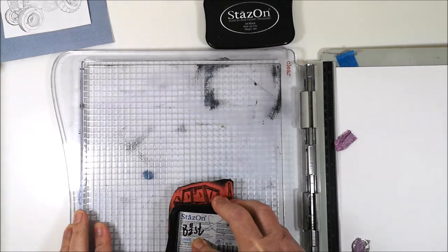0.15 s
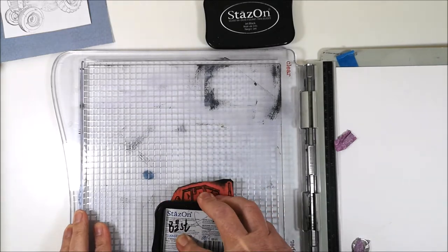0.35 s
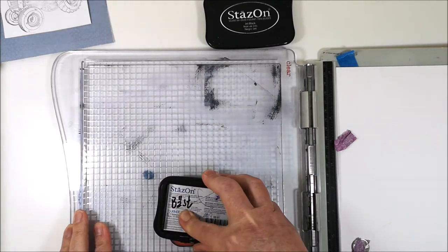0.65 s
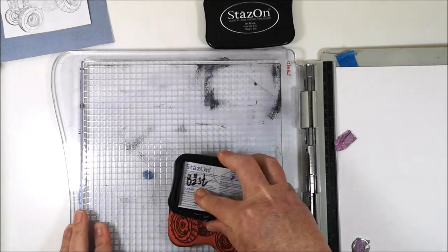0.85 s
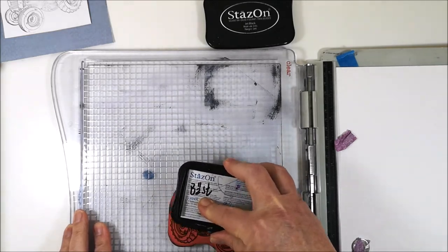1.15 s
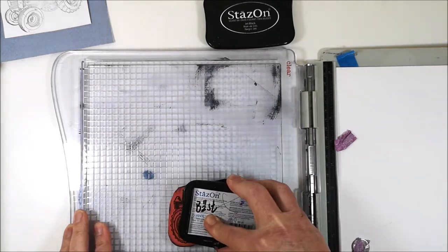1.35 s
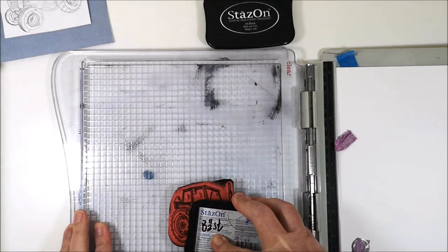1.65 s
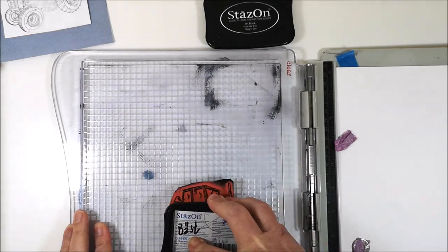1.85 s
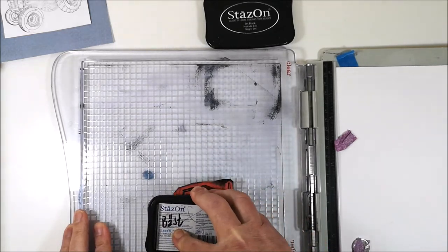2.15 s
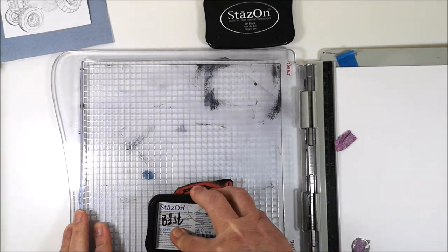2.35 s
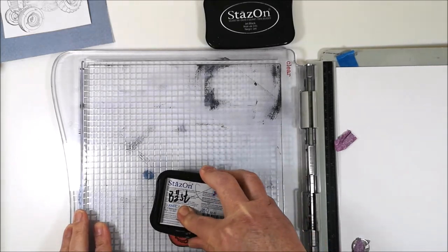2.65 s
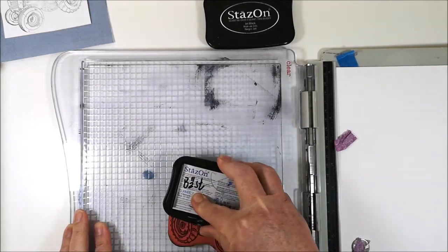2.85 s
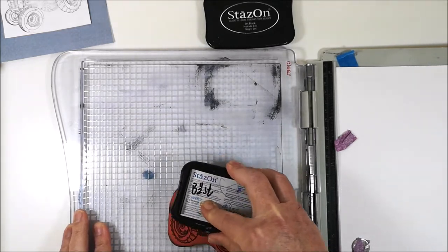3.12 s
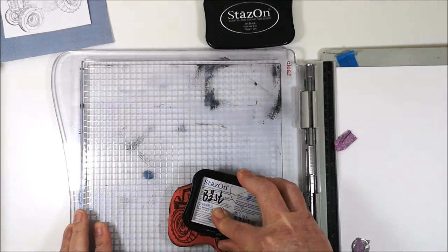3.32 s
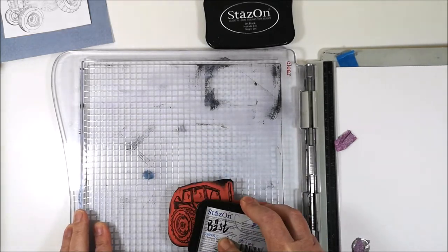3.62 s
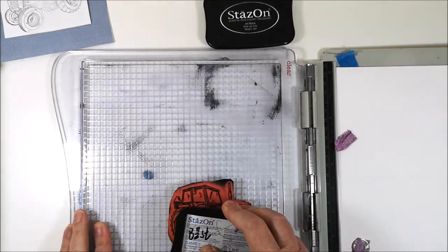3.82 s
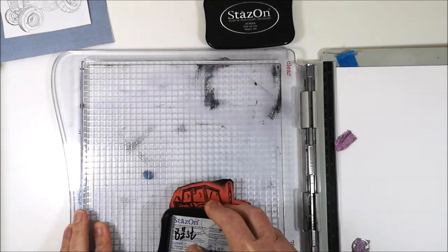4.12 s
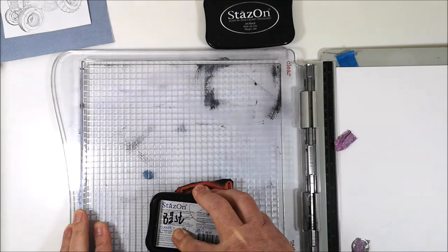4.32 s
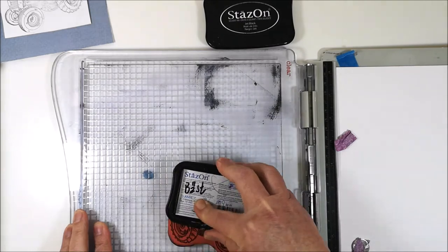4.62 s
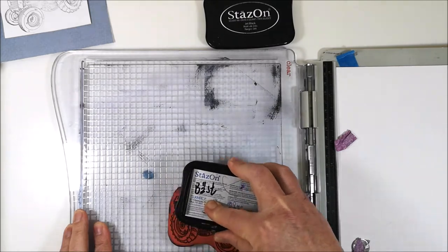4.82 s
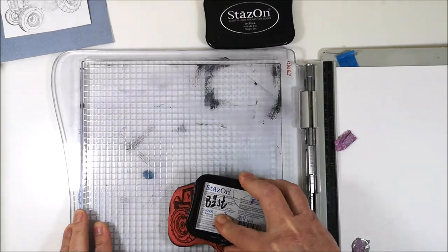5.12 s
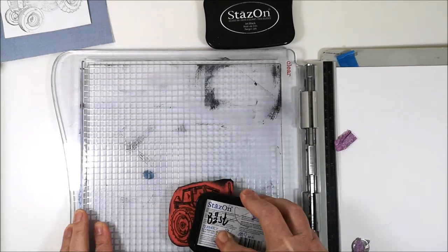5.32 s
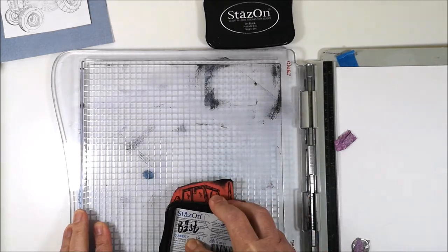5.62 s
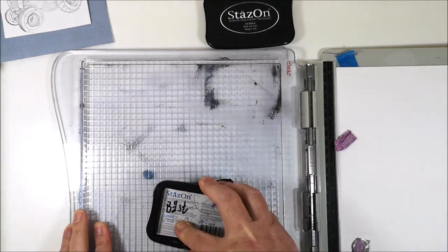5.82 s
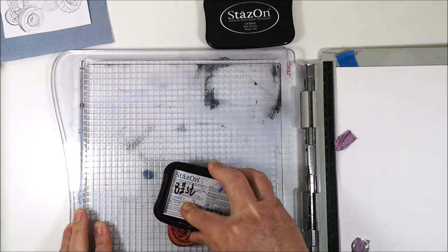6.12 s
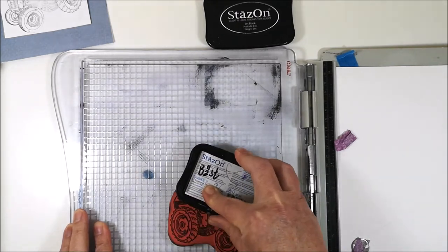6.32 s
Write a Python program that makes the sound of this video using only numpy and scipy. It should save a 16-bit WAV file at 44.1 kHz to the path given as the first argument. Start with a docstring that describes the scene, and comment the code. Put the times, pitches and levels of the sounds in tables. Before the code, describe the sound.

An ink pad in a plastic case dabs a stamp about three times a second, with soft hollow knocks and occasional sharper clacks.

```python
"""Dabbing an ink pad on a rubber stamp

An ink pad in a plastic case dabs, three times a second, a stamp on a plastic plate on a table.
Each dab rings damped modes of plate, case and table, then of the stand of the microphones.
Noise bursts give the rattle and slap of the case and the ticks of the tacky pad; a creak is one mode.
Decaying noise answers as a small room, over machine hum and hiss; a suppressor closes between dabs."""
import sys
import numpy as np
from scipy import signal
from scipy.fft import rfft, irfft, next_fast_len
from scipy.io import wavfile
from scipy.ndimage import uniform_filter1d, minimum_filter1d, map_coordinates

SR = 44100
rng = np.random.default_rng(int(sys.argv[2]) if len(sys.argv) > 2 else 0)


def voltage_ratio(level):
    """Linear amplitude factor for a level in decibels (scalar or array-like)."""
    return 10 ** (np.asarray(level, float) / 20)


def put_to_file(sound):
    """Save the sound as 16-bit audio at rate SR, in the file named by the first command-line argument."""
    columns = np.atleast_2d(sound).T  # one column per channel
    safe = np.clip(columns, -1, 1)
    whole_steps = np.round(safe * 32767)
    wavfile.write(sys.argv[1], SR, whole_steps.astype(np.int16))


N = 284886  # samples in the scene
T = np.arange(SR // 2) / SR  # time axis of one event, s

# machine hum lines: (f/Hz, mean level/dB rms)
HUM_LINES = [(48.4, -55), (96.9, -55.5), (118.4, -66.5)]
# hiss spectrum: (f/Hz, relative level/dB)
HISS_SPECTRUM = [(15, -34.5), (25, 0), (48, -24), (107, -11.5), (122, -15), (160, -32.5), (194, -27.5),
                 (423, -32), (584, -37.5), (807, -42.5), (1380, -38.5), (1960, -33), (4060, -42),
                 (7750, -50), (15600, -60.5)]
# left-right correlation of the hiss: (f/Hz, correlation)
HISS_CORRELATION = [(60, 0.98), (150, 0.92), (300, 0.51), (600, 0)]
# decay of the room: (f/Hz, t60/s)
ROOM_DECAY = [(100, 0.49), (500, 0.3), (1500, 0.38), (4000, 0.51), (10000, 0.4)]
# room over direct sound: (f/Hz, level/dB)
ROOM_LEVEL = [(60, -14), (200, -9.5), (420, -7), (800, -5), (2000, -4.5), (6000, -5.5)]
# the walls answer more from the right: (f/Hz, left over right level/dB)
ROOM_PAN = [(300, 0), (1500, -3), (6000, -2)]
# direct sound: (f/Hz, left over right level/dB)
DIRECT_PAN = [(300, 0), (700, 1), (2000, 1), (4000, 6), (9000, 5), (14000, -3.5)]
# the tacky pad lets go of the rubber: (t/s, level/dB before the tick's spectrum)
PAD_LIFTS = [(0.58, -57), (1.5508, -50.5), (2.2162, -45.5), (2.5185, -49.5), (3.1874, -43), (4.351, -49),
             (4.564, -47.5), (5.5882, -46), (5.882, -45.5)]
# a finger shifts on the case: (t/s, level/dB, f/Hz)
CASE_CREAKS = [(0.6858, -41, 2630), (2.3577, -34.5, 2200)]
# the case slaps down: (t/s, level/dB before the slap's spectrum)
CASE_SLAPS = [(0.0899, -20), (0.395, -41), (0.6855, -55), (1.0006, -44.5), (1.3524, -24), (1.6796, -43),
              (2.0174, -21), (2.3311, -35.5), (2.6424, -53.5), (2.964, -49), (3.325, -30), (3.683, -26.5),
              (4.0444, -22.5), (4.3919, -49), (4.7077, -32), (5.0398, -25.5), (5.3574, -46),
              (5.7039, -35.5), (6.0501, -40.5), (6.3854, -34.5)]
# spectrum of a slap: (f/Hz, relative level/dB)
SLAP_SPECTRUM = [(150, -45), (600, -20), (1500, -3), (3000, 0), (4200, -6), (5200, -3), (8300, -4),
                 (9500, -14), (10300, -22), (11000, -38), (15500, -48)]
# dabs and rebounds: (t/s, plate ring level/dB, knock level/dB, table thud level/dB, squeeze of the pad/ms)
DAB_BLOWS = [(.091, -14.5, -17.5, -20.5, 4.94), (.104, -21.5, -20.5, -27, 4.6),
             (0.389, -35.5, -37, -26, 4.8), (.688, -25, -45, -31, 4.8), (1.0016, -21, -32, -25.5, 2.9),
             (1.352, -17, -29.5, -22, 4.4), (1.675, -21.5, -26, -21.5, 5.46), (1.686, -34, -33.5, -33.5, 4),
             (2.018, -11.5, -19.5, -20.5, 3.82), (2.324, -33, -35, -25.5, 7.6),
             (2.642, -25.5, -43, -29, 3.34), (2.966, -19.5, -37.5, -27.5, 3.47),
             (3.321, -18.5, -30, -25, 5), (3.68, -19, -29, -22, 3.97), (3.696, -22, -27.5, -25, 5.3),
             (4.043, -20.5, -20.5, -22.5, 5.52), (4.056, -32, -30, -33.5, 4.5),
             (4.387, -29.5, -31.5, -21, 4.15), (4.706, -22.5, -26, -21.5, 5.34),
             (5.036, -17, -35, -25, 3.3), (5.355, -31, -40, -26.5, 4.7), (5.704, -20.5, -28.5, -23, 4.92),
             (6.043, -30.5, -34, -25.5, 7.4), (6.384, -26.5, -31.5, -23.5, 3.7)]
# lower and upper main plate modes: (f/Hz, t60/s)
PLATE_MODES = [(384, 0.081), (462, 0.07)]
# case and plate modes in the knock, before random spread: (f/Hz, relative level/dB, t60/s)
CASE_MODES = [(671.5, -3, 0.064), (788.4, 1, 0.068), (832, 2, 0.061), (941.3, 1, 0.057),
              (1022, -3.5, 0.071), (1155, -3, 0.075), (1221.5, -15.5, 0.085), (1340, -9, 0.033),
              (1512, -22.5, 0.026), (1751, -3.5, 0.038), (1961, 6, 0.032), (2056, -8, 0.037),
              (2453, -14.5, .03)]
# loose noise of the case: (f/Hz, relative level/dB)
RATTLE_SPECTRUM = [(50, -2), (150, 8.5), (300, 7), (620, 17.5), (800, 20), (1500, 19), (2500, 11),
                   (4000, -0.5), (8000, -27.5)]
# table modes: (f/Hz, relative level/dB, t60/s, sign of the first swing)
TABLE_MODES = [(21.3, -16, .5, 1), (48.4, -10, .5, -1), (60.4, -4, .19, -1), (100, -8.6, .29, -1),
               (133.4, -11.3, .32, 1)]
# microphone stand modes: (f/Hz, relative level/dB, t60/s, sign of the first swing)
STAND_MODES = [(44.8, -9.7, .33, 1), (71.7, -17.5, .34, 1), (83.5, -11.6, .245, -1), (125, -12.4, .135, -1)]
# upper modes of the table top, before random spread: (f/Hz, relative level/dB, t60/s)
BOARD_MODES = [(150.5, -14.5, 0.3), (168.5, -13, 0.3), (206, -17, 0.22), (234.1, -9.5, 0.19),
               (275.5, -18.5, 0.24), (320, -14, 0.21)]
# noise suppressor bands: (from f/Hz, to f/Hz, fully open from level/dB, attenuation when shut/dB)
GATE_BANDS = [(162, 520, -64, 11), (700, 4400, -54, 5), (2600, 20500, -55, 4)]

RIGHT_DELAY_S = 0.00017  # the left microphone is nearer
SQUEEZE_S = 0.004  # the soft pad touches this long before the blow is heard in full
KNOCK_LAG_S = 0.0015  # the case takes the blow after the pad has given
# upper plate mode over the lower: level at a 5 ms squeeze, change per ms, highest
UPPER_DB, UPPER_DB_PER_MS, UPPER_TOP_DB = 0, 6, 5
# start of the table thud relative to the blow time: offset in s, plus this many squeeze times
THUD_OFFSET_S, THUD_OFFSET_PER_SQUEEZE = -0.006, 0.37


def along(points, hz):
    """Interpolation of (f/Hz, value) points on a logarithmic frequency axis."""
    f, value = np.transpose(points)
    return np.interp(np.log(hz + 1), np.log(f + 1), value)


def filtered(x, response):
    """Linear filtering: the spectrum is multiplied by a function of frequency."""
    size = next_fast_len(x.shape[-1] + 8192)
    spectrum = rfft(x, size) * response(np.fft.rfftfreq(size, 1 / SR))
    return irfft(spectrum, size)[..., :x.shape[-1]]


def add(track, s, sound):
    """Superposition of one event on a stereo track at s seconds."""
    track[:, max(round(s * SR), 0):][:, :len(T)] += sound


def ring(hz, t60, rise_s, late_s=0, phase=0):
    """Damped resonance: a mode builds over the contact time, then decays exponentially."""
    t = np.maximum(T - late_s, 0)
    build_up = (1 - np.exp(-t / rise_s)) ** 2
    return np.sin(2 * np.pi * hz * t + phase) * voltage_ratio(-60 * t / t60) * build_up


def burst(rise_s, t60):
    """Decaying noise, uncorrelated between the two microphones."""
    build_up = (1 - np.exp(-T / rise_s)) ** 2
    return rng.standard_normal((2, len(T))) * build_up * voltage_ratio(-60 * T / t60)


def wobble(rate):
    """Slow random modulation: a smooth curve through rate random knots a second."""
    knots = rng.standard_normal(int(N * rate / SR) + 4)
    return map_coordinates(knots, [np.arange(N) * rate / SR])


def machine_hum():
    """Line spectrum: steady frequencies whose level and phase wander slowly."""
    t = np.arange(N) / SR
    hum = np.zeros(N)
    for hz, db in HUM_LINES:
        level_db = db + 1.5 * wobble(3)
        phase = 0.5 * wobble(2)  # rad
        hum += np.sqrt(2) * voltage_ratio(level_db) * np.sin(2 * np.pi * hz * t + phase)
    return hum


def hiss():
    """Partial coherence: mid and side noise shares make the bass nearly alike at both microphones."""
    def shares(hz):
        angle = np.arccos(np.clip(along(HISS_CORRELATION, hz), -1, 1)) / 2
        return voltage_ratio(along(HISS_SPECTRUM, hz)) * [np.cos(angle), np.sin(angle)]

    mid, side = filtered(rng.standard_normal((2, N)), shares)
    drift_db = 0.8 * wobble(3)
    return voltage_ratio(-20.5 + drift_db) * np.array([mid + side, mid - side])


def room(x):
    """Reverberation: convolution with noise that decays at a rate set by frequency."""
    out = np.zeros((2, N + SR))
    step = SR // 3  # each third of a second of sound meets a fresh tail
    for start in range(0, N, step):
        hz, t, z = signal.stft(rng.standard_normal((2, SR // 2)), SR, nperseg=256)
        decay = voltage_ratio(-60 * t / along(ROOM_DECAY, hz)[:, None])
        tail = signal.istft(z * decay, SR, nperseg=256)[1]
        tail = tail / np.linalg.norm(tail[0])
        wet = signal.fftconvolve(x[:, start:start + step], tail, axes=1)
        out[:, start + 300:][:, :wet.shape[1]] += wet  # delayed by 300 samples
    return out[:, :N]


def small_sounds():
    """Release of adhesion gives a noise tick; a shifting finger excites one short mode of the case."""
    track = np.zeros((2, N + SR))
    tick_spectrum = [(700, -19), (1800, 7), (4500, -6), (7500, 1.5), (11000, -16.5)]  # (f/Hz, level/dB)
    for s, db in PAD_LIFTS:
        tick = filtered(burst(0.00038, 0.013), lambda hz: voltage_ratio(along(tick_spectrum, hz)))
        add(track, s, voltage_ratio(db) * tick)
    for s, db, hz in CASE_CREAKS:
        add(track, s, voltage_ratio(db) * ring(hz, 0.031, 0.0002) * np.ones((2, 1)))
    return track[:, :N]


def slaps():
    """Impact of hard bodies: the brief contact of case and plate gives a bright, short crack."""
    track = np.zeros((2, N + SR))
    for s, db in CASE_SLAPS:
        add(track, s, voltage_ratio(db) * burst(0.00025, 0.036))
    return filtered(track[:, :N], lambda hz: voltage_ratio(along(SLAP_SPECTRUM, hz)))


def table_thud():
    """Structure-borne sound: the table modes swing first, the stand modes 36 ms later."""
    thud = np.zeros(len(T))
    for hz, db, t60, sign in TABLE_MODES:
        thud += sign * voltage_ratio(db) * ring(hz, t60, 0.0073)
    for hz, db, t60, sign in STAND_MODES:
        thud += sign * voltage_ratio(db) * ring(hz, t60, 0.0028, late_s=0.0359)
    board = np.zeros(len(T))
    for hz, db, t60 in BOARD_MODES:
        # where the blow lands sets the level and phase of each upper mode
        level_chance, phase_chance = rng.standard_normal(2)
        board += voltage_ratio(db + 2.6 * level_chance) * ring(hz, t60, 0.017, phase=3 * phase_chance)
    return thud * voltage_ratio([[0], [-0.4]]) + board


def case_knock(rise_s, late):
    """Modal radiation: each mode of the case reaches each microphone differently, with loose rattle."""
    knock = np.zeros((2, len(T)))
    for hz, db, t60 in CASE_MODES:
        level_chance, pitch_chance, phase_chance = rng.standard_normal((3, 2, 1))
        mode_hz = hz * (1 + 0.022 * pitch_chance[0])  # the same at both microphones
        mode = ring(mode_hz, t60, 1.07 * rise_s, late, 3 * phase_chance)
        knock += voltage_ratio(db + 3.1 * level_chance) * mode
    rattle = filtered(burst(0.88 * rise_s, 0.053), lambda hz: voltage_ratio(along(RATTLE_SPECTRUM, hz)))
    return knock + rattle


def plate_ring(low_db, squeeze_ms, rise_s, late):
    """Modal superposition: the upper plate mode is louder with a longer squeeze, up to a limit."""
    high_db = low_db + min(UPPER_DB + UPPER_DB_PER_MS * (squeeze_ms - 5), UPPER_TOP_DB)
    plate = np.zeros((2, len(T)))
    for db, (hz, t60) in zip((low_db, high_db), PLATE_MODES):
        plate -= voltage_ratio(db) * ring(hz, t60, 0.76 * rise_s, late)
    return plate


def dabs():
    """Two transmission paths: plate ring and case knock through air, thud through the solid."""
    air, solid = np.zeros((2, 2, N + SR))
    late = np.array([[0], [RIGHT_DELAY_S]])
    for s, low_db, knock_db, thud_db, squeeze_ms in DAB_BLOWS:
        rise_s = max(squeeze_ms, 1) / 1000
        touch_s = s - SQUEEZE_S
        add(air, touch_s, plate_ring(low_db, squeeze_ms, rise_s, late))
        add(air, touch_s + KNOCK_LAG_S, voltage_ratio(knock_db) * case_knock(rise_s, late))
        # a longer squeeze reaches the table later
        thud_s = s + THUD_OFFSET_S + THUD_OFFSET_PER_SQUEEZE * rise_s
        add(solid, thud_s, voltage_ratio(thud_db) * table_thud())
    return air[:, :N], solid[:, :N]


def scene():
    """Superposition of direct sound, room, structure-borne thud and background."""
    background = machine_hum() + hiss()
    small = small_sounds()
    air, solid = dabs()
    air = air + slaps()
    sides = np.array([[0.5], [-0.5]])  # half of each level difference goes to each side
    direct = filtered(air + small, lambda hz: voltage_ratio(sides * along(DIRECT_PAN, hz)))
    # the ticks and creaks are nearly dry, with little room sound
    into_room = air + voltage_ratio(-13) * small
    wet = filtered(room(into_room), lambda hz: voltage_ratio(along(ROOM_LEVEL, hz) + sides * along(ROOM_PAN, hz)))
    return direct + wet + solid + background


def suppressor(x, knee_db, hold_s):
    """Downward expansion: each band above the bass is turned down once it has stayed quiet."""
    def above(hz, edge_hz):
        return 1 / (1 + (edge_hz / (hz + 1)) ** 4)

    out, hold = x.copy(), int(hold_s * SR)
    for low_hz, high_hz, open_db, depth_db in GATE_BANDS:
        band = filtered(x, lambda hz: above(hz, low_hz) - above(hz, high_hz))
        power = np.abs(uniform_filter1d(np.mean(band ** 2, axis=0), size=768))
        level_db = 10 * np.log10(power + 1e-12)
        shut = np.clip((open_db - level_db) / knee_db, 0, 1)
        # the hold window looks mostly back and about 300 samples ahead
        shut = minimum_filter1d(shut, hold, origin=(hold - 1) // 2 - 300)
        gain = voltage_ratio(-depth_db * uniform_filter1d(shut, size=600))
        out -= band * (1 - gain)
    return out


def band_limit(x):
    """A steep low-pass at the top of the band."""
    return signal.sosfilt(signal.butter(12, 15760, fs=SR, output="sos"), x)


def record(dry):
    """Band limitation: noise suppression is followed by a sharp low-pass at 15750 Hz."""
    quieted = suppressor(dry, knee_db=2.5, hold_s=0.046)
    mix = filtered(quieted, lambda hz: hz < 15750)
    return band_limit(mix)


dry = scene()
out = record(dry)
put_to_file(out)
```